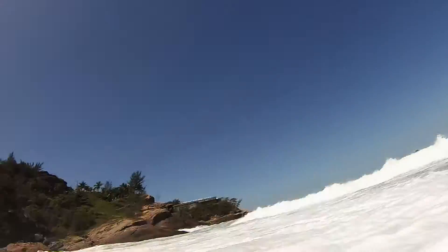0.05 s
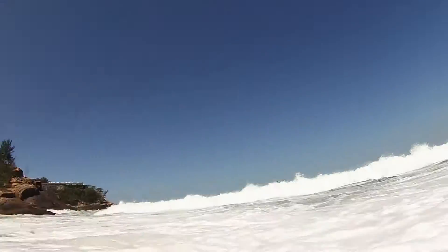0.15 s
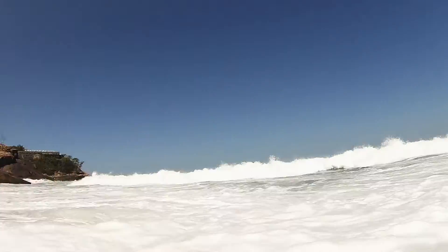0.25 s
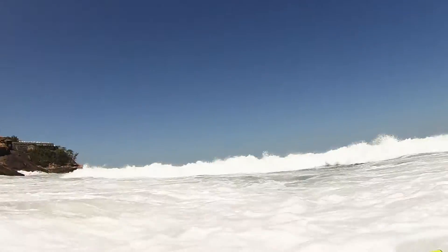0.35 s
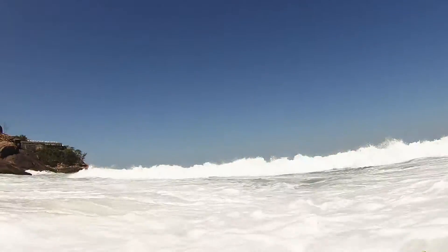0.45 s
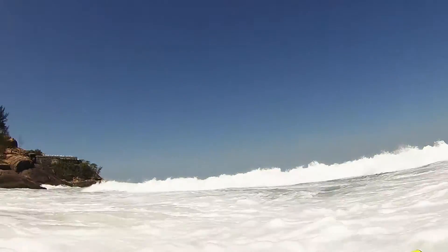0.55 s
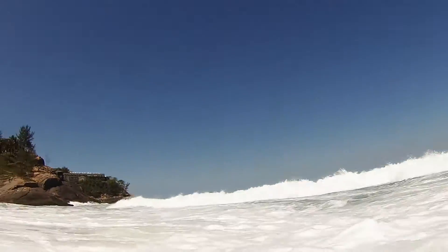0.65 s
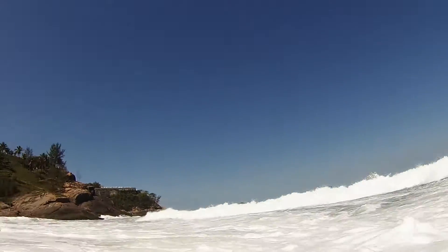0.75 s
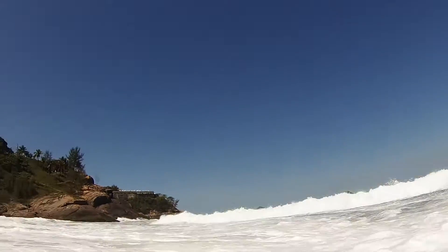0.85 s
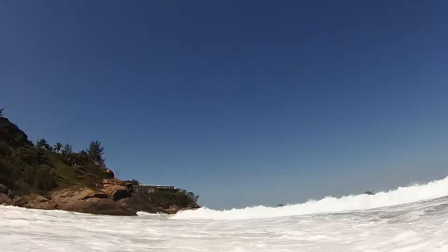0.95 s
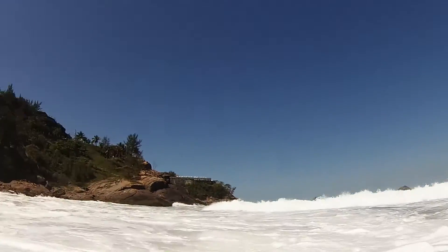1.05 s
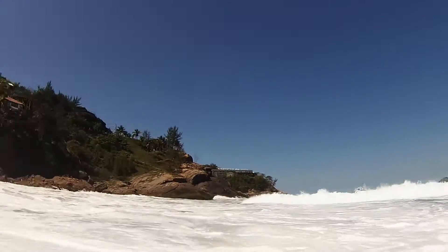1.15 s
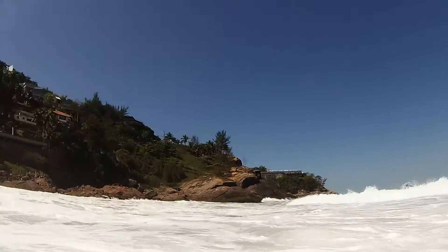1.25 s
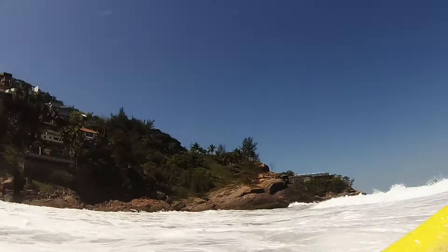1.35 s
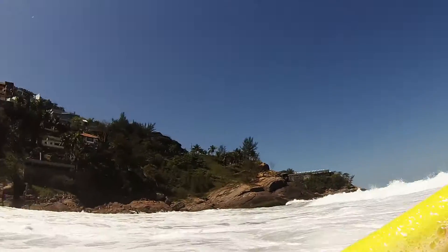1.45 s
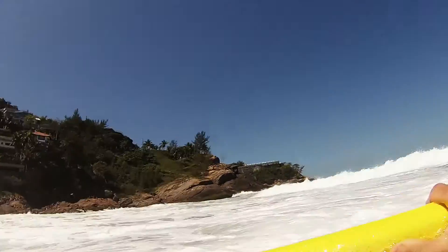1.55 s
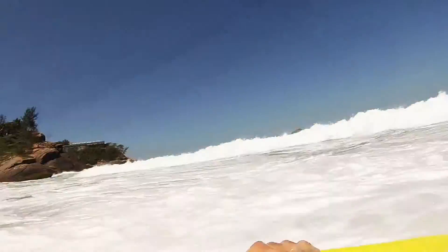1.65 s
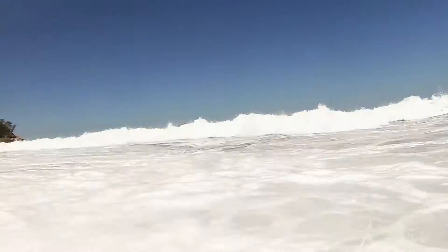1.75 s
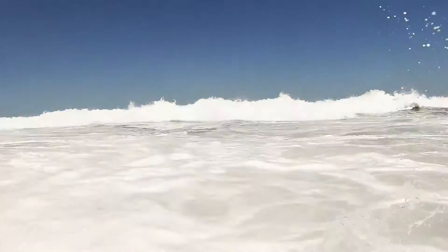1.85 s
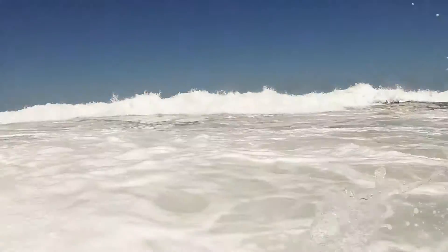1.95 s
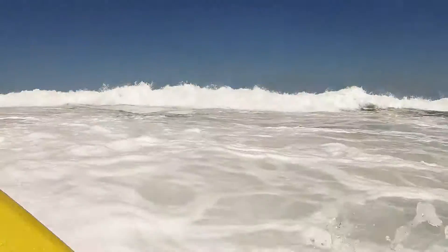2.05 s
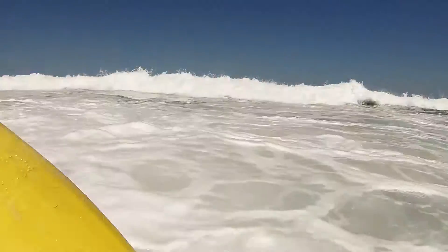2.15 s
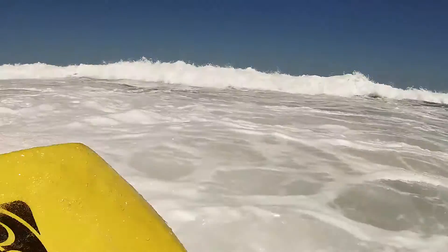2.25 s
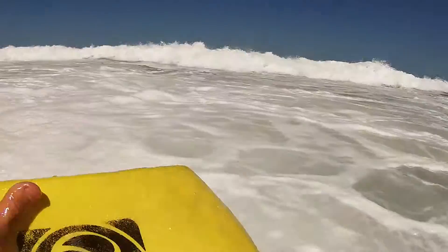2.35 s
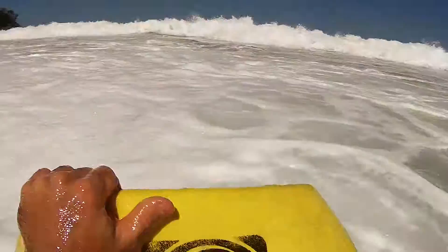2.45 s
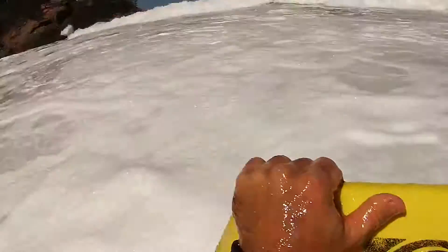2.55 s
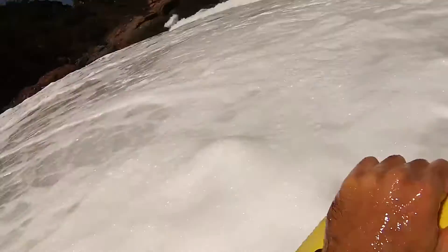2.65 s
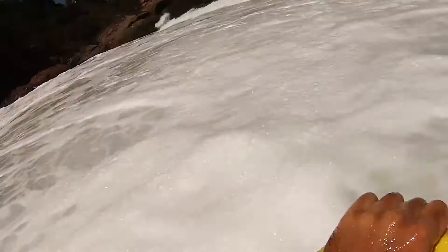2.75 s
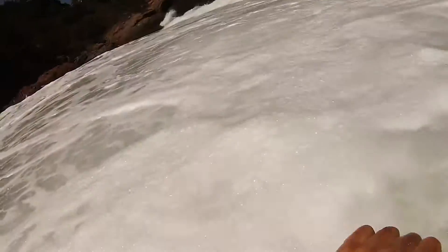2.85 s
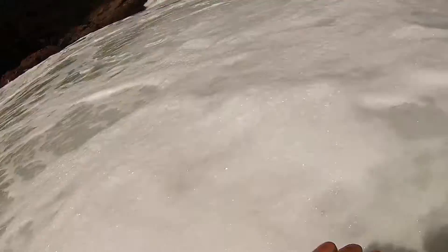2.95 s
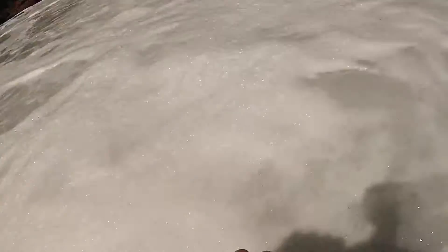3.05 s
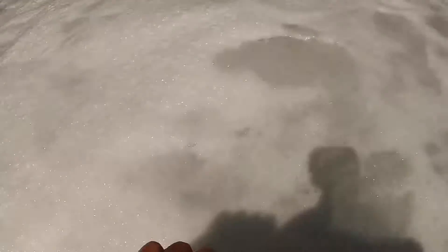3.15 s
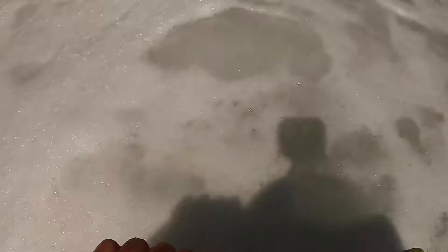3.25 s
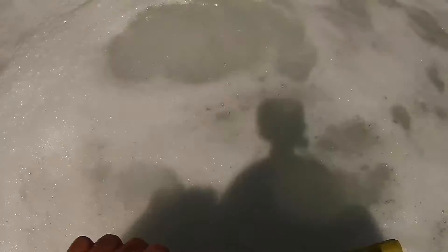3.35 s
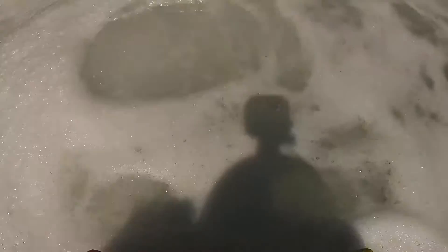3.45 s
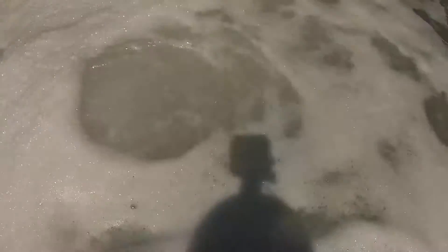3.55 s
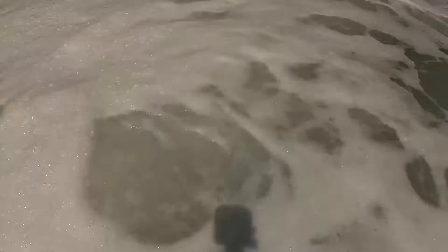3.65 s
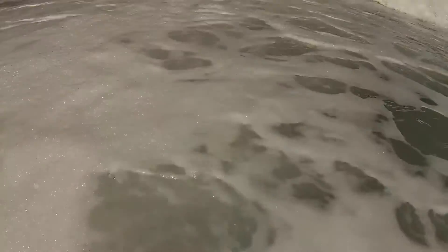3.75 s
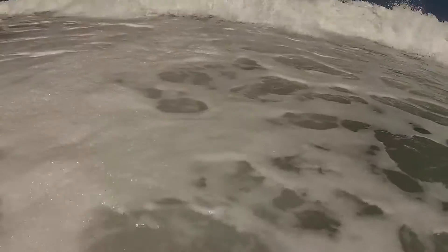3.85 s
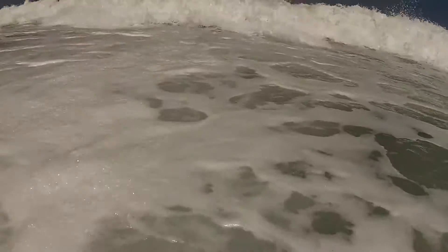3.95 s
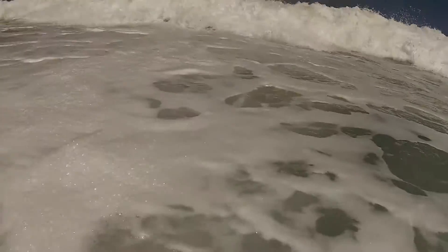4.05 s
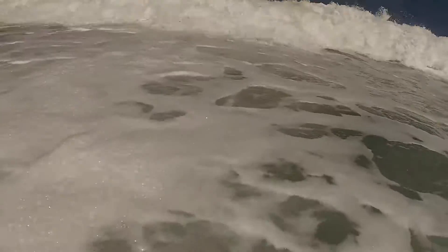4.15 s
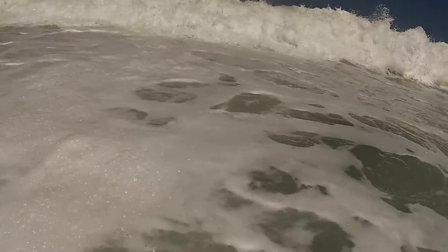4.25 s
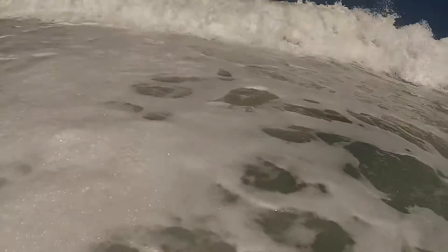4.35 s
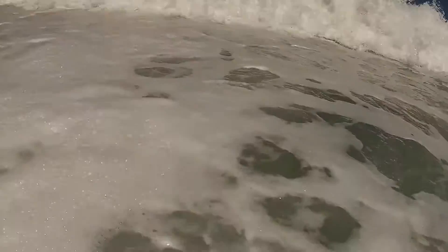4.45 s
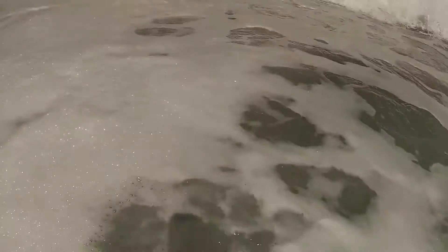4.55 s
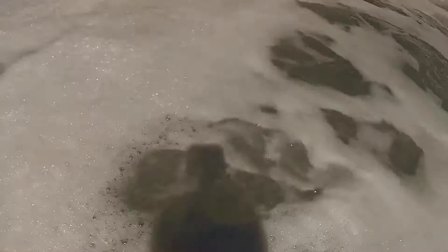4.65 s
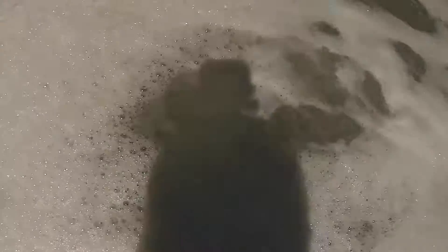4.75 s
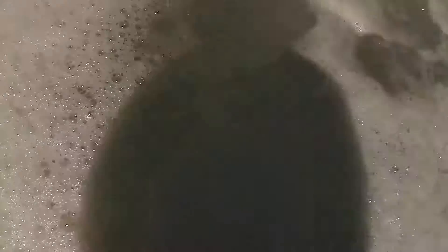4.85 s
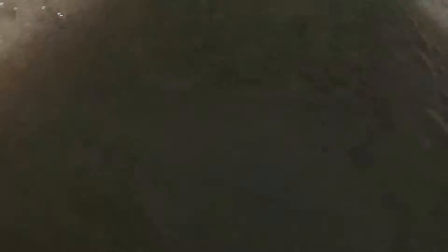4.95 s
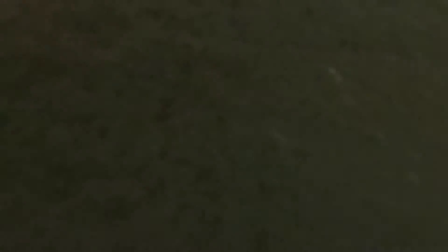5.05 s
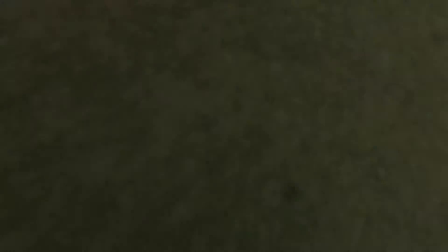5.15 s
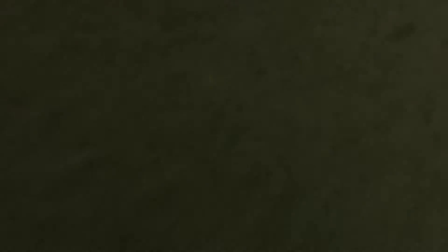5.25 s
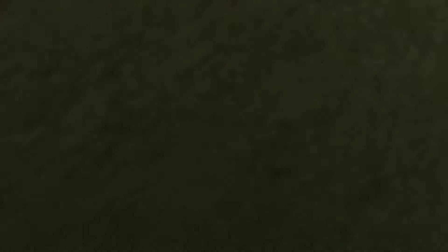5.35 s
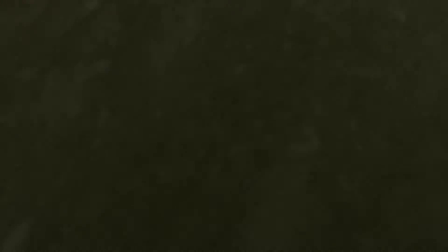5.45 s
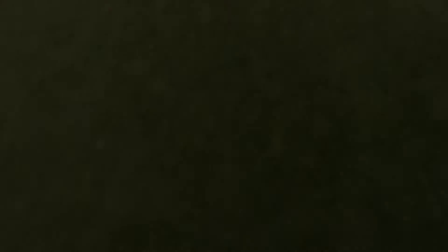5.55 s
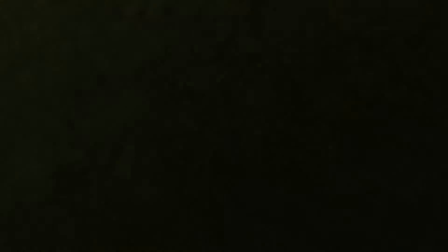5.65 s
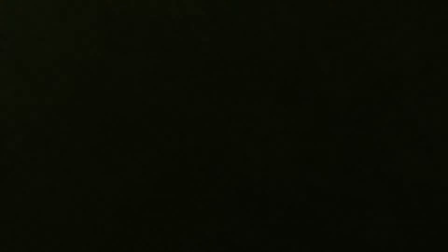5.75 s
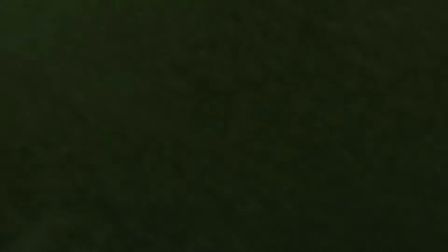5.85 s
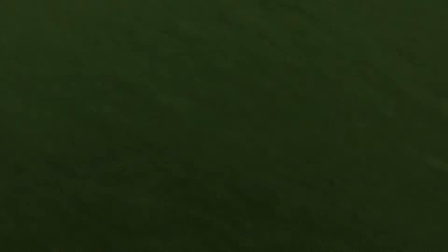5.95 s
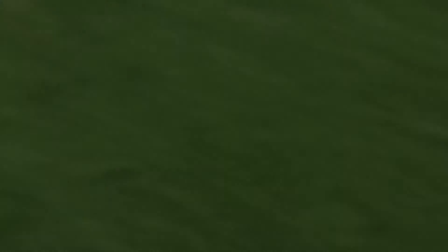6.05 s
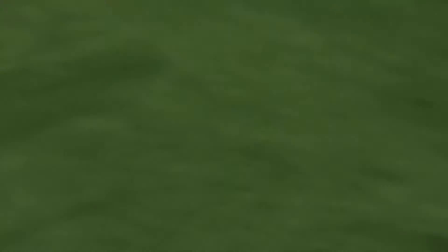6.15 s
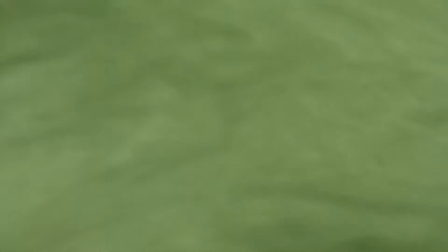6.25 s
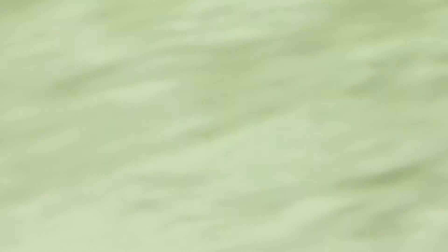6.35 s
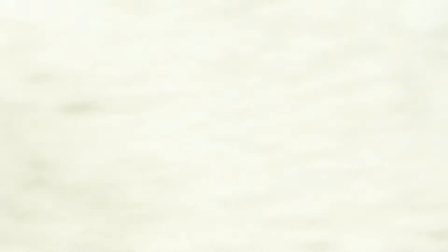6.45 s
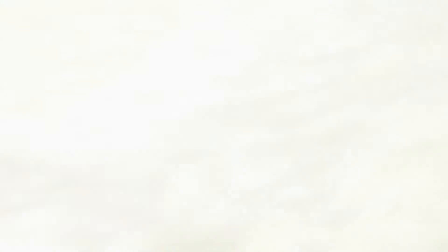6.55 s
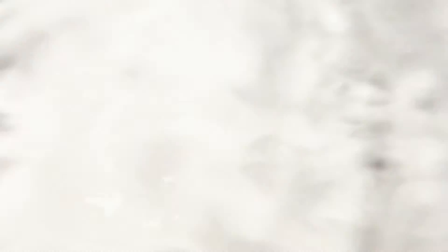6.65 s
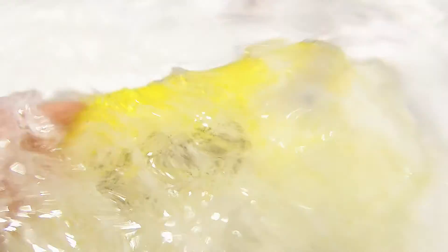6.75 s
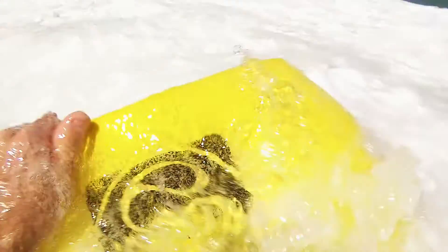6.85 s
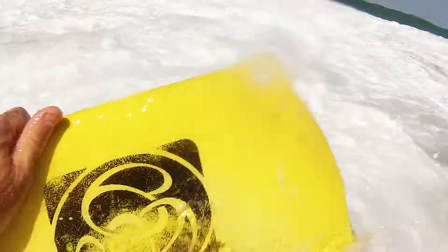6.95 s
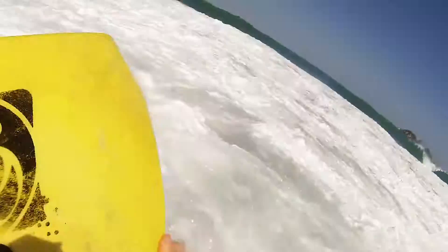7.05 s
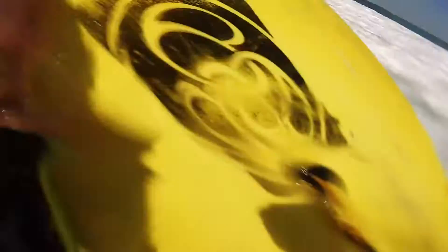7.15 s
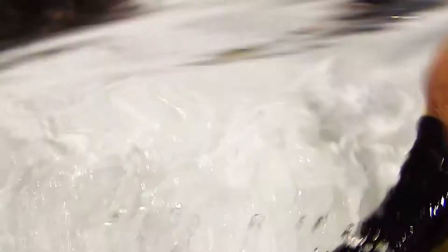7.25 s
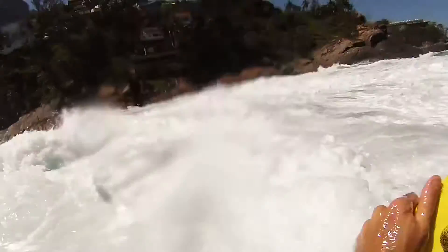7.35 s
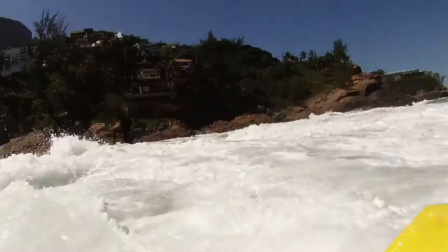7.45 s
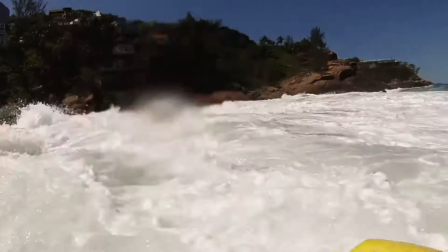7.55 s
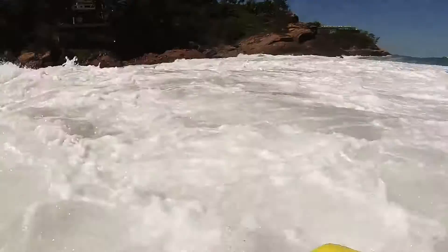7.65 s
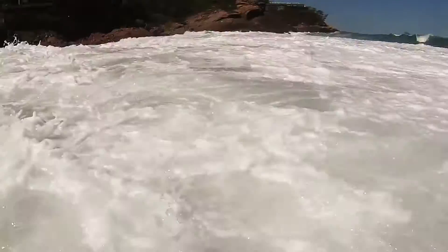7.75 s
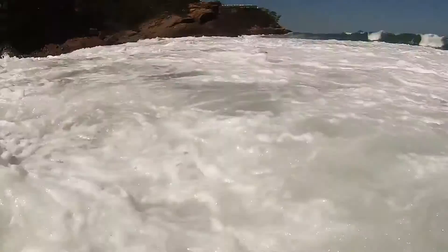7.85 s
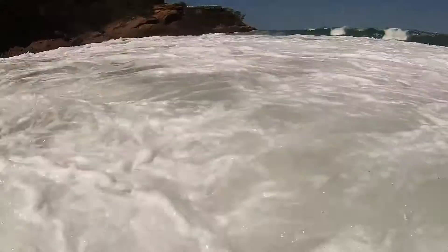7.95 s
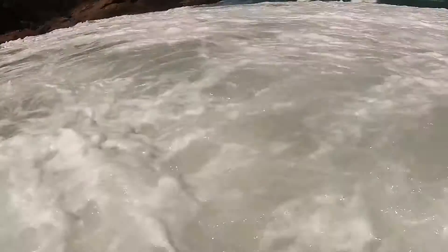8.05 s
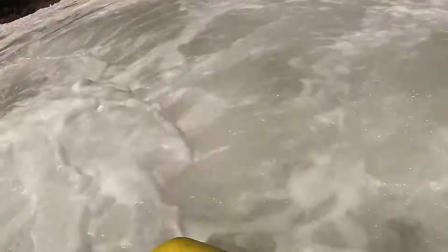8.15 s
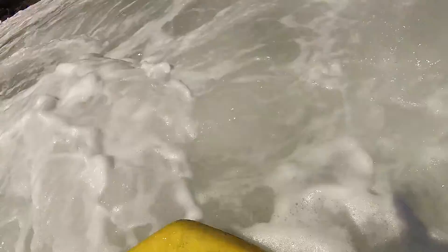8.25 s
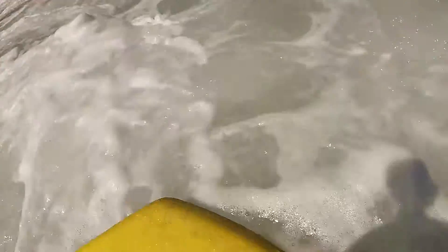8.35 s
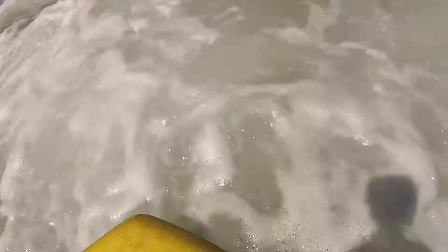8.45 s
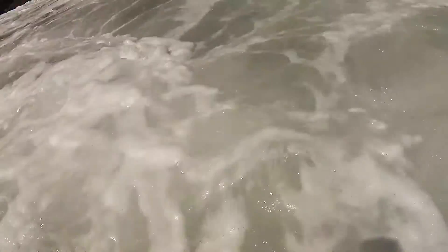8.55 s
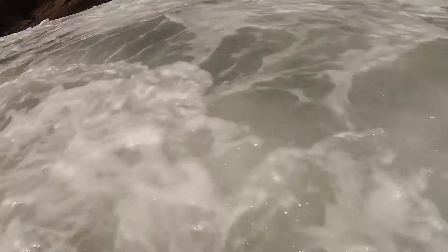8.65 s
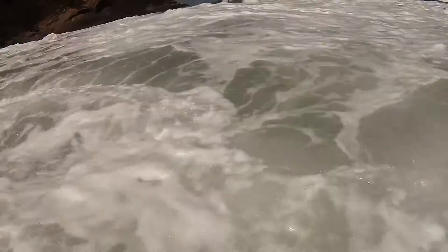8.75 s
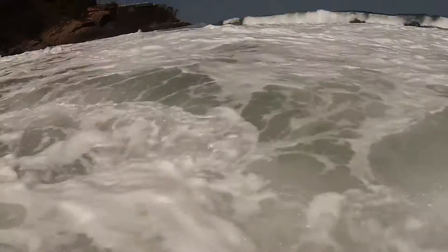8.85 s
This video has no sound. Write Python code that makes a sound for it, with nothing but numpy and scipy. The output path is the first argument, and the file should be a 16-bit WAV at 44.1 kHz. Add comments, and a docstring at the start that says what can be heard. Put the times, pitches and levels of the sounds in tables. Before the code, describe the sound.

From inside a sealed camera case, quiet dull surf gives way to a violent watery dunking, hollow bubbling and crackling, then subdued wet wash.

```python
"""Churning water shoves and crackles round a head-mounted camera in a sealed case, as it ducks under a line
of whitewater and comes up in foam. Filtered noise makes the shoves, the gurgling air pocket and the spray.
Drops, thumps, bubble snaps and shudders are short decaying or swelling sine waves on top.
Surf, made of lumpy noise dulled by the case, is heard before the dive and after it."""
import sys
import numpy as np
from scipy.fft import rfft, irfft, next_fast_len
from scipy.io import wavfile
from scipy.ndimage import map_coordinates

SR = 44100
rng = np.random.default_rng(int(sys.argv[2]) if len(sys.argv) > 2 else 0)


def unload_audio(sound):
    """Save the sound as a 16-bit wav file, at the path given as the first command line argument."""
    columns = np.transpose(np.atleast_2d(sound))
    # keep every value between -1 and 1, then stretch to whole-number steps
    steps = np.round(np.clip(columns, -1, 1) * 32767)
    wavfile.write(sys.argv[1], SR, steps.astype(np.int16))


N = 393355
T = np.arange(N) / SR  # time of each sample, s
DEEP_START_S, DEEP_END_S = 5.3, 5.95  # the case is well under

# resonances of the air pocket inside the case: (frequency [Hz], width [Hz], level [dB])
POCKET = [(1390, 234, 2), (2260, 280, 1.5), (833, 940, -6), (3220, 430, -2.5)]


def amp(db):
    """Turn decibels into a plain multiplier."""
    return 10 ** (np.asarray(db) / 20)


def unit(x):
    """Scale a signal to an average strength (rms) of 1."""
    return x / np.sqrt(np.mean(x ** 2) + 1e-20)


def gains(rows):
    """Draw one gain curve for each dB column, fading to silence outside the rows."""
    times, *columns = np.transpose(rows)
    inside = np.minimum(T - times[0], times[-1] - T)
    fade = np.clip(1 + inside / .06, 0, 1)  # fades last 0.06 s
    return [fade * amp(np.interp(T, times, db)) for db in columns]


def wobble(rate):
    """Draw a smooth random curve with `rate` random points a second."""
    points = rng.standard_normal(int(N * rate / SR) + 4)
    return map_coordinates(points, [T * rate])


def filtered(x, response):
    """Multiply the spectrum of x by a response that depends on frequency."""
    size = next_fast_len(N + 8192)
    spectrum = rfft(x, size) * response(np.fft.rfftfreq(size, 1 / SR))
    return irfft(spectrum, size)[:N]


def shape(points):
    """Join (Hz, dB) points into a tone-colour curve on a log frequency axis."""
    f, db = np.transpose(points)
    return lambda hz: amp(np.interp(np.log(hz + 1), np.log(f + 1), db, left=-120, right=-120))


def modes(rows):
    """Add up resonances, each strongest near its centre, with alternating signs."""
    def response(f):
        total = 0
        for k, (centre, width, db) in enumerate(rows):
            peak = 1j * f * width / (centre * centre - f * f + 1j * f * width)
            total = total + (-1) ** k * amp(db) * peak
        return total
    return response


def rush(response, lump_db, lump_rate):
    """Make coloured noise of rms 1 whose level comes in lumps."""
    noise = rng.standard_normal(N) * amp(lump_db * wobble(lump_rate))
    return unit(filtered(noise, response))


def bubbles(per_s, mid_hz, octaves, cycles, spread_db):
    """Scatter short bubble pops of random pitch and size, with rms 1 in all."""
    start = rng.integers(0, N, (int(per_s * N / SR), 1))
    pitch, size = np.clip(rng.standard_normal((2, len(start), 1)), -2.2, 2.2)
    hz = np.minimum(mid_hz * 2 ** (octaves * pitch), 13000)
    t = np.arange(160) / SR
    envelope = np.exp(-t * hz / cycles) * (1 - np.exp(-t * hz))
    pops = np.sin(2 * np.pi * hz * t) * envelope * amp(spread_db * size)
    places = start + np.arange(len(t))
    return unit(np.bincount(places.ravel(), pops.ravel(), N + len(t))[:N])


def ring(hz, t60, attack, t):
    """Make a sine that starts softly and falls by 60 dB in t60 seconds."""
    return np.sin(2 * np.pi * hz * t) * amp(-60 * t / t60) * (1 - np.exp(-t / attack)) ** 2


def add_at(track, start_s, sound):
    """Mix a short sound into a track at a given time."""
    track[round(start_s * SR):][:len(sound)] += sound


def surf():
    """Surf above water is hiss, roar and low swell; the dry shell adds sharp resonances, the wet one more drips."""
    # surf swelling as the wave nears, then ebbing after the dive:
    # (time [s], hiss level [dB], low swell level [dB], roar level [dB])
    before_dive = [
        (0.0, -55, -47.5, -52.5), (0.8, -56, -57, -55), (1.0, -55.5, -48, -50.5),
        (1.4, -55.5, -50, -52.5), (2.1, -56, -55.5, -54), (2.7, -57.5, -42, -51.5),
        (3.7, -56, -52, -51.5), (4.3, -56, -42, -53.5), (4.98, -52, -43, -47.5)]
    after_dive = [
        (7.7, -47.5, -43, -48.5), (7.9, -47.5, -48, -51), (8.2, -51.5, -39, -56.5), (8.92, -52.5, -49, -53)]
    # tone of the hiss through the dry and the streaming shell: (frequency [Hz], level per Hz [dB])
    dry_case = [(290, 9), (500, -3), (888, -13.5), (1430, 6), (1930, -4), (2610, -4.5), (3430, -9.5),
                (4130, -10.5), (4910, -11.5), (7450, -12.5), (10700, -19.5), (15500, -34)]
    wet_case = [(290, -50), (500, -13), (1040, -3), (1490, 11), (1820, -3.5), (2800, -2.5), (3380, -12),
                (6930, -14), (11300, -26), (13800, -45), (15500, -60)]
    # tone of the low roar: (frequency [Hz], level per Hz [dB])
    roar_tone = [(41, -66), (70, 3), (107, 4.5), (247, 1.5), (440, 0), (759, -10), (900, -16), (1170, -33),
                 (1980, -120)]
    # narrow resonances of the dry shell: (frequency [Hz], width [Hz], relative level [dB])
    lid_modes = [(4140, 140, 2), (6650, 450, -3), (2580, 200, -4)]
    lid_grows_db_per_s = 1  # they gain as the wave nears

    def lid(f):
        return shape(dry_case)(f) * sum(np.abs(modes([m])(f)) for m in lid_modes)

    lid_rings = amp(-12 + lid_grows_db_per_s * T) * rush(lid, 1.0, 14) * (T < DEEP_START_S)
    out = np.zeros(N)
    for rows, case, ticks_db, fine_db in ((before_dive, dry_case, -17, -30), (after_dive, wet_case, -12, -19)):
        hiss, swell, roar = gains(rows)
        ticks = amp(ticks_db) * bubbles(50, 2900, octaves=.6, cycles=3, spread_db=4)
        ticks += amp(fine_db) * bubbles(60, 7800, octaves=0.28, cycles=3.7, spread_db=1.5)
        out += hiss * (rush(shape(case), 0.91, 16) + ticks + lid_rings)
        out += swell * rush(modes([(14.5, 6.9, 0)]), 3.55, lump_rate=5.5)
        out += roar * rush(shape(roar_tone), 0.85, 21)
    return out


def shudders():
    """The mount swings up and down again within a few cycles."""
    # shudders near the mount's rocking pitch: (time [s], length [s], peak level [dB], frequency [Hz])
    shudder_rows = [(2.58, 0.054, -41.5, 108), (2.65, 0.049, -36.5, 106), (2.74, .1, -43, 106.5),
                    (8.348, 0.055, -27.5, 110)]
    out = np.zeros(N)
    for start, length, db, hz in shudder_rows:
        swing = np.sin(np.pi * np.clip((T - start) / length, 0, 1))
        out += amp(db) * swing * np.sin(2 * np.pi * hz * (T - start))
    return out


def snaps():
    """A small bubble rings briefly, rising in pitch as it nears the surface."""
    # small bubbles snapping on the shell: (time [s], level [dB], starting pitch [Hz])
    snap_rows = [(0.0681, -37, 3030), (0.1438, -38.5, 2010), (0.2293, -36.5, 2000), (0.3307, -35, 1770),
                 (0.421, -36, 1160), (0.505, -44, 1880), (0.554, -42, 2040), (0.6333, -39, 4180),
                 (0.6491, -41, 3200), (0.8517, -41, 4400), (0.87, -44, 4200), (1.0362, -39, 2610),
                 (1.665, -40, 2000), (1.8491, -47, 1890), (2.191, -44, 2200), (2.332, -35.5, 2690),
                 (2.598, -38.5, 2480), (3.24, -39, 1730), (3.27, -42, 3500), (3.36, -39, 2500),
                 (3.59, -38, 3000), (4.19, -39, 1300), (4.965, -34, 3080), (5.1957, -12, 6850),
                 (5.209, -21, 3450), (5.281, -26, 5330), (5.345, -26.5, 4600), (5.491, -36.5, 3840),
                 (5.6645, -33, 2920), (5.7034, -35.5, 7900), (5.967, -35, 4630), (5.9665, -33, 10000),
                 (5.9991, -36, 6890), (6.0665, -23, 7400), (6.119, -16, 3600), (6.1943, -17, 8500),
                 (6.2046, -18, 8650), (6.2415, -10, 4000), (6.243, -16, 10800), (6.441, -19, 10900),
                 (6.5117, -13.5, 5000), (6.544, -15.5, 5130), (6.586, -25, 7600), (6.632, -25, 5970),
                 (6.654, -19, 8460), (6.693, -27, 8620), (6.7007, -14, 4300), (6.709, -24, 4360),
                 (6.7247, -22.5, 5870), (6.7663, -30, 5860), (6.9, -31, 2200), (7.03, -28.5, 3500),
                 (7.098, -32, 3140), (7.2227, -33, 10340), (7.301, -32, 5470), (7.6474, -29.5, 2540),
                 (7.75, -41, 4150), (7.991, -32, 2820), (8.032, -35, 1950), (8.0603, -34.5, 2070),
                 (8.0904, -32, 2030), (8.129, -33.5, 2100), (8.211, -34, 2700), (8.237, -36, 2890),
                 (8.296, -36, 2480), (8.3314, -30, 2400), (8.345, -31.5, 2630), (8.425, -25, 2740),
                 (8.3848, -42, 9000), (8.425, -38, 8300), (8.4466, -38, 7600), (8.4983, -37.5, 4780),
                 (8.5671, -32, 2750), (8.6195, -34.5, 4270), (8.6485, -34.5, 7360), (8.6549, -35, 2820),
                 (8.773, -31, 2540)]
    out, t = np.zeros(N + SR), np.arange(SR // 100) / SR
    for start, db, hz in snap_rows:
        rising_hz = hz * (1 + 30 * t)
        add_at(out, start, amp(db) * ring(rising_hz, .002 + 12 / hz, .00006, t))
    return out[:N]


def drops():
    """A drop rings at its own pitch; away from deep water it also splats and stirs the pocket's second mode."""
    # big bubbles and drops that ring the air pocket: (time [s], level [dB], frequency [Hz])
    drop_rows = [(0.595, -29, 2350), (0.908, -33, 1500), (0.988, -30, 1430), (1.357, -22.5, 1530),
                 (1.363, -29, 1520), (1.371, -30, 1440), (1.781, -25, 1400), (2.009, -35, 1500),
                 (2.746, -29, 2120), (3.596, -31.5, 1530), (5.042, -10, 1390), (5.076, -5.5, 660),
                 (5.096, -3.5, 2060), (5.174, -7.5, 1190), (5.195, -9, 1290), (5.217, -14, 1610),
                 (5.234, -1.5, 1130), (5.245, 0, 690), (5.259, -1, 1450), (5.293, -23, 1590),
                 (5.344, -6, 1580), (5.351, -8, 636), (5.381, -8, 1390), (5.399, -7.5, 1500),
                 (5.441, -25, 2560), (5.456, -7, 1445), (5.557, -9.5, 1630), (5.619, -15, 1480),
                 (5.68, -14, 1440), (5.732, -16, 1190), (5.779, -18.5, 1330), (5.925, -23, 1200),
                 (5.948, -23.5, 2050), (6.105, -8, 1470), (6.164, -14, 2660), (6.208, -7.5, 1580),
                 (6.242, -12, 2150), (6.277, -9, 1500), (6.305, -8, 1550), (6.35, 0, 1620),
                 (6.477, -0.5, 2200), (6.499, -3, 2260), (6.736, -9, 1580), (6.761, -13.5, 643),
                 (6.8, -22, 970), (7.22, -13.5, 1510), (7.271, -27, 2240), (7.287, -25, 2160),
                 (7.357, -18.5, 1430), (7.384, -27, 1390), (7.789, -19, 1410), (8.425, -26.5, 1330)]
    # what a splat excites in the shell: (frequency [Hz], width [Hz], level [dB])
    splat_modes = [(1560, 1900, 1), (3460, 3000, -9)]
    drop_t60_s, splat_t60_s = 0.013, 0.027
    air_attack_s, deep_attack_s = 0.00042, 0.00047  # in air or froth, and deep down
    splat_db = -5.5  # splat noise, before the shell colours it, over the ring

    out, splats = np.zeros(N + SR), np.zeros(N + SR)
    t = np.arange(SR // 20) / SR
    for start, db, hz in drop_rows:
        noise = rng.standard_normal(len(t))
        deep = DEEP_START_S < start < DEEP_END_S
        sound = ring(hz, drop_t60_s, deep_attack_s if deep else air_attack_s, t)
        if not deep:
            sound += amp(1.5) * ring(POCKET[1][0], 0.0033, 0.00038, t)
            add_at(splats, start, amp(db + splat_db - 60 * t / splat_t60_s) * noise)
        add_at(out, start, amp(db) * sound)

    def splat_tone(f):
        return modes(splat_modes)(f) / (1 + 1j * f / 4000) ** 2  # duller above 4000 Hz

    return out[:N] + filtered(splats[:N], splat_tone)


def thumps():
    """A soft blow swings the mount for a few cycles; the shell adds a higher knock."""
    # thumps of water and board on the mount: (time [s], level [dB], frequency [Hz])
    thump_rows = [(0.42, -32.5, 378), (0.979, -35, 327), (2.563, -20, 105), (4.261, -34, 157),
                  (5.038, -1, 107), (5.065, -19, 42), (5.088, -4.5, 106), (5.196, -19, 110),
                  (5.239, -1.5, 217), (6.079, -1, 45.3), (6.097, -2, 82), (6.173, -4, 78), (6.259, 1.5, 81),
                  (6.558, -1, 89), (6.689, -7, 78), (7.218, -10.5, 119), (7.297, -13.5, 105.5),
                  (7.492, -20, 115), (7.539, -24, 279), (7.784, -29.5, 170), (8.159, -23, 113),
                  (8.283, -28.5, 227), (8.327, -23.5, 97), (8.516, -10, 59), (8.535, -9.5, 40),
                  (8.547, -14.5, 107)]
    thump_t60_s = 0.054
    out, t = np.zeros(N + SR), np.arange(SR // 4) / SR
    knock = amp(-5.5) * ring(298, 0.031, 0.0023, t)
    for start, db, hz in thump_rows:
        swing = ring(hz, thump_t60_s, 0.2 / hz, t)  # swells over about a quarter cycle
        add_at(out, start, -amp(db) * (swing + knock))
    return out[:N]


def shoves(mount, pocket, fizz):
    """Turbulent water pushes the case slowly, rocks it on its strap and churns round it."""
    # tone of the churn: (frequency [Hz], level per Hz [dB])
    churn_tone = [(82, -28), (140, -4.5), (231, 0), (450, -7.5), (750, -16.5), (1500, -20), (2600, -99)]
    rocking = modes([(88.3, 65, 0)])  # the case rocking on its strap: Hz, width Hz, dB
    surge = np.hypot(amp(-11.5) * mount, amp(6.5) * fizz)  # dB over turbulence, over spray
    churn = np.hypot(amp(-5) * mount, amp(-8) * pocket)  # dB over turbulence, over gurgle
    low = surge * rush(modes([(28.8, 4.5, 0)]), 1, 20)
    low += mount * rush(lambda f: rocking(f) ** 2, 2.6, 25)
    return low + churn * rush(shape(churn_tone), 2.5, 40)


def pocket_noise(up):
    """Bubbles ring the air pocket: single ones under water, then finer foam in a sharper pocket."""
    # the pocket once the camera is up: (frequency [Hz], width [Hz], level [dB])
    drained_pocket = [(1397, 290, 1.5), (2290, 170, -5.5), (3120, 1200, -28)]
    deep_damping_hz = 2590  # deep water damps the pocket above this
    deep_blips_db = -7  # lone bubbles over the undamped gurgle
    knocks = bubbles(700, 1700, octaves=.6, cycles=1.5, spread_db=4)
    shell = modes([(1690, 3500, 0)])

    gurgle = (knocks + amp(2.5) * rng.standard_normal(N)) * amp(3.26 * wobble(60))
    under = unit(filtered(gurgle, lambda f: modes(POCKET)(f) * shell(f)))
    damped = filtered(under, lambda f: 1 / (1 + (f / deep_damping_hz) ** 2))
    blips = amp(deep_blips_db) * bubbles(200, 1700, octaves=0.46, cycles=2.5, spread_db=3.0)
    deep = np.clip(np.minimum(T - DEEP_START_S, DEEP_END_S - T) / 0.066, 0, 1)
    under = (1 - deep) * under + deep * (damped + blips)

    foam = knocks + amp(7.0) * rng.standard_normal(N)
    above = unit(filtered(foam, lambda f: modes(drained_pocket)(f) * shell(f)))
    return np.cos(up) * under + np.sin(up) * above


def foam_on_shell(fizz, up):
    """Foam lands on the shell in clumps of hiss, with bursting bubbles that crackle."""
    # tone of the fizz: (frequency [Hz], level per Hz [dB])
    fizz_tone = [(1300, -37), (2500, 0.5), (4300, -17.5), (7500, -18), (11100, -25.5), (15500, -68)]
    crackle_db = -1.5  # middle crackle level over the fizz, while under water
    clumps = fizz * amp(1.12 * wobble(30))
    crackle = amp(crackle_db + 2.9 * wobble(20)) * clumps
    pops = bubbles(1000, 5000, octaves=.7, cycles=2.5, spread_db=4.5)
    pops = unit(filtered(pops, lambda f: modes([(5500, 8000, 0)])(f) ** 2))
    hiss = rush(shape(fizz_tone), lump_db=1.8, lump_rate=90)
    # the crackle gets weaker as the shell drains
    return clumps * hiss + crackle * np.cos(0.62 * up) * pops


def wash():
    """Water round the case drives the shoves, the air pocket and the foam on the shell together."""
    # force of the water in the plunge, under the wave and in its wake: (time [s], level [dB])
    turbulence_levels = [(5.0, -60), (5.05, -24), (5.1, -13), (5.15, -54), (5.2, -19), (5.225, -31),
                         (5.26, -24), (5.3, -30.5), (5.4, -29), (5.55, -33.5), (5.65, -28), (5.75, -23),
                         (5.9, -24), (6.3, -21.5), (6.45, -29), (6.54, -31), (6.58, -23.5), (6.7, -32),
                         (6.8, -37.5), (7.05, -46), (7.29, -33.5), (7.5, -41.5), (7.8, -53)]
    # bubbles working at the air pocket: (time [s], level [dB])
    gurgle_levels = [(5.0, -54), (5.05, -40), (5.09, -23.5), (5.2, -31), (5.23, -27), (5.26, -17.5),
                     (5.285, -27.5), (5.4, -37.5), (5.8, -38), (5.9, -47), (6.04, -30.5), (6.1, -25.5),
                     (6.2, -32), (6.32, -18.5), (6.45, -26), (6.6, -31.5), (6.72, -35), (6.8, -41),
                     (7.05, -43.5), (7.4, -38), (7.68, -45), (7.8, -69)]
    # foam breaking over the shell: (time [s], level [dB])
    spray_levels = [(5.0, -65), (5.06, -52), (5.09, -22.5), (5.15, -42.5), (5.28, -51), (5.34, -68),
                    (5.88, -65), (5.97, -59.5), (6.04, -52), (6.08, -35), (6.13, -40.5), (6.18, -45),
                    (6.32, -25.5), (6.45, -32.5), (6.57, -46.5), (6.66, -44), (6.7, -56.5), (7.0, -51.5),
                    (7.42, -50.5), (7.68, -53.5), (7.8, -88)]
    (mount,), (pocket,), (fizz,) = gains(turbulence_levels), gains(gurgle_levels), gains(spray_levels)
    # the water runs off the case from 6.7 to 6.85 s; this angle blends under water into above
    up = np.interp(T, (6.7, 6.85), [0, np.pi / 2])
    return shoves(mount, pocket, fizz) + pocket * pocket_noise(up) + foam_on_shell(fizz, up)


def scene():
    """Add all the sources into one channel."""
    return (surf() + shudders() + snaps() + drops() + thumps() + wash())[None]


def record(dry):
    """The input saturates softly near full scale and nothing is kept above the band limit."""
    top_hz = 15700
    soft = dry[0] / (1 + np.abs(dry[0]) ** 6) ** (1 / 6)
    return filtered(soft, lambda hz: hz < top_hz)[None]


dry = scene()
out = record(dry)
unload_audio(out)
```